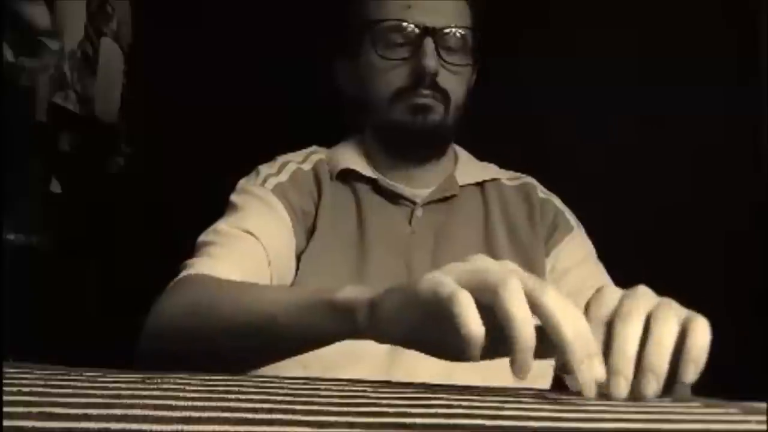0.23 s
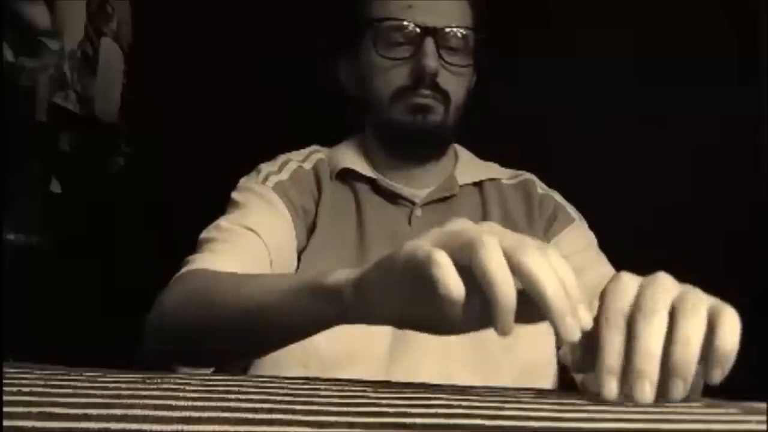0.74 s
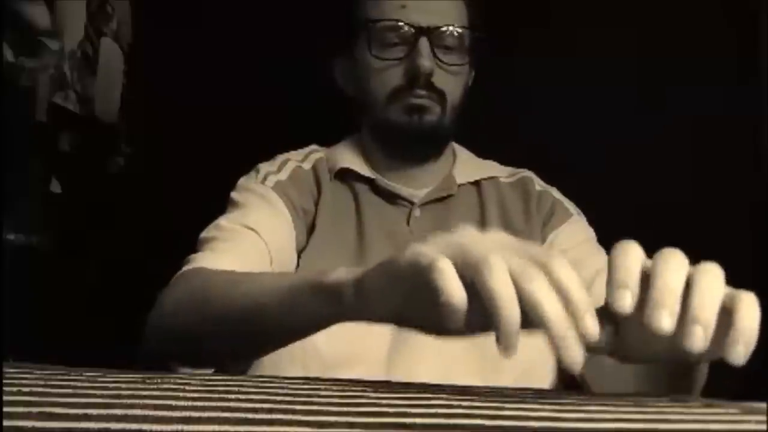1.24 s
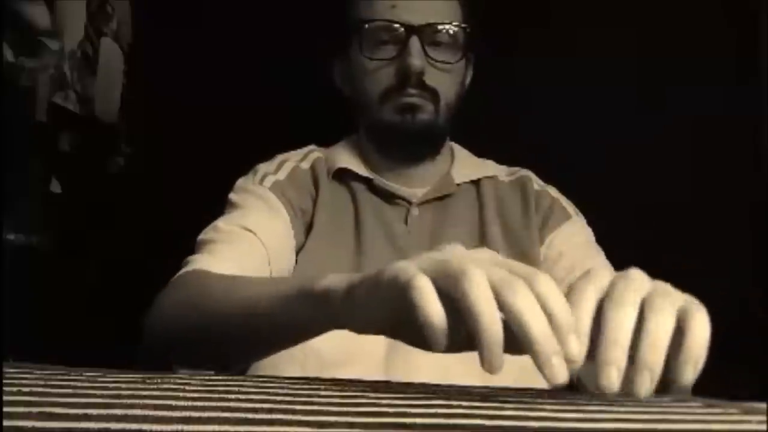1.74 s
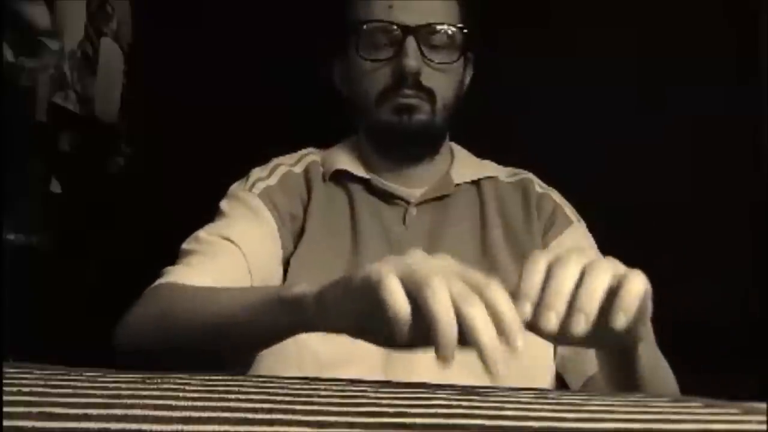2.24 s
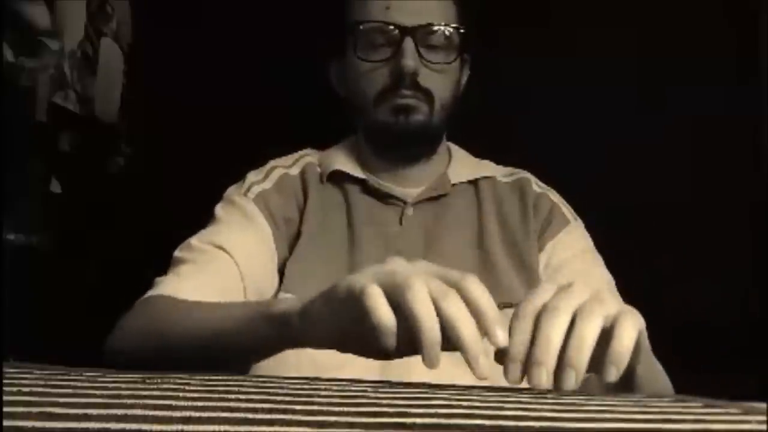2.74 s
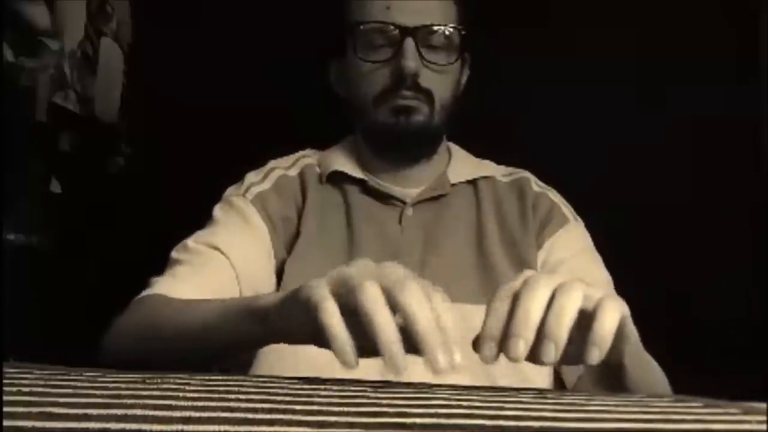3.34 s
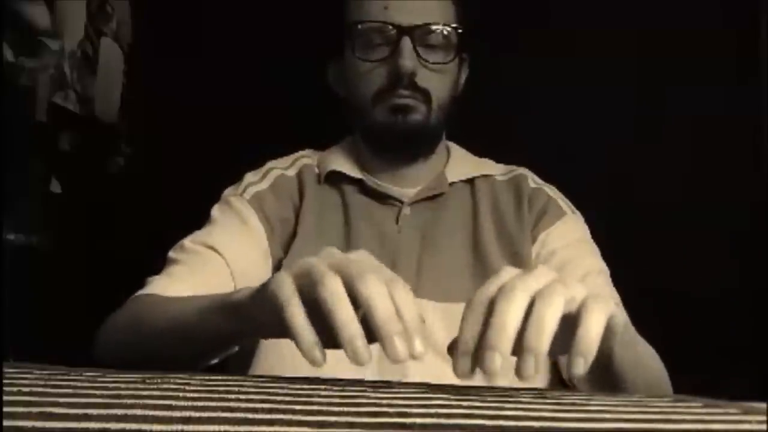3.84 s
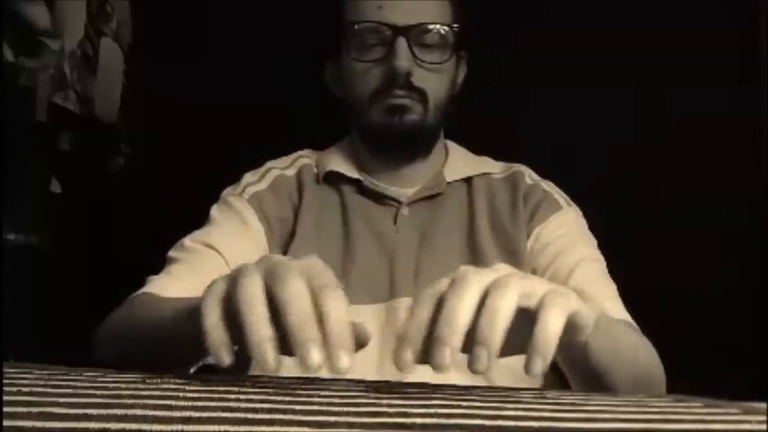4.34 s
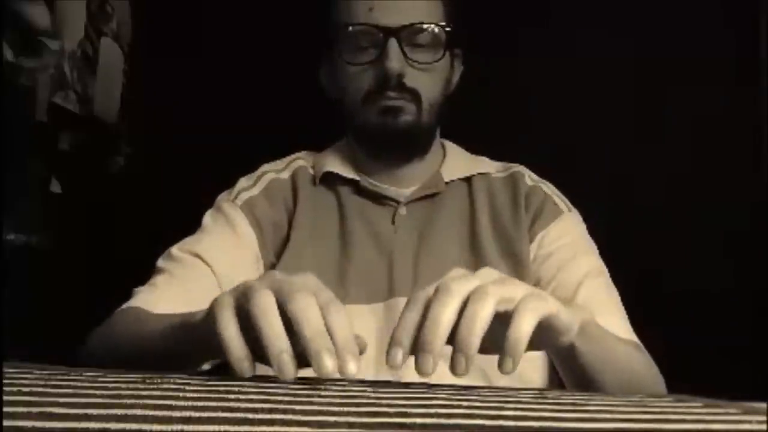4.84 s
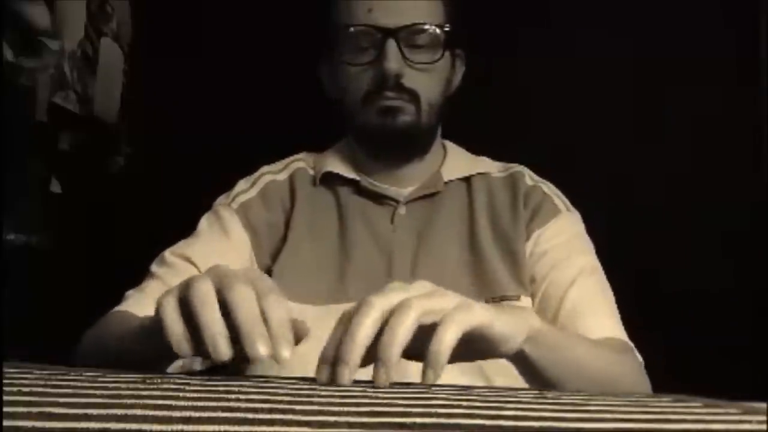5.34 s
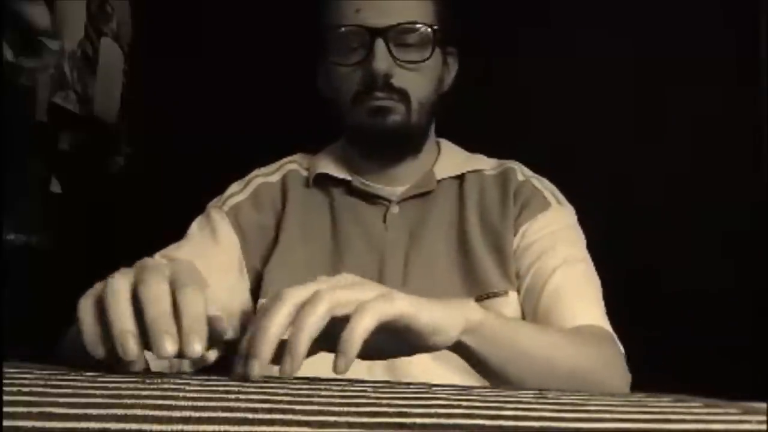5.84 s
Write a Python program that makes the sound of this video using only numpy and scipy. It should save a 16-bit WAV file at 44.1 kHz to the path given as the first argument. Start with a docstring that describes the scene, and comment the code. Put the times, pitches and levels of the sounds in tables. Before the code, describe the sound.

Close, irregular finger tapping on a wooden tabletop drifts from right to left, growing scratchier and ending with two sharp nail clicks.

```python
"""In a quiet room, forearms shift on a cloth-covered wooden table: noise keeps its low modes murmuring.
Then fingertips drum unevenly from right to left: each landing rings a bank of board modes,
nails tick as short noise cracks through nail resonances, and pads scuff the weave as clumped noise.
From 4.3 s the fingers curl and slides sound finer; the last and loudest ticks come just after 6 s.
Feedback delays echo all contacts; two spaced microphones on the table hear place as level and delay."""
import sys
import numpy as np
from scipy import signal
from scipy.fft import rfft, irfft, next_fast_len
from scipy.io import wavfile

SR = 44100
rng = np.random.default_rng(int(sys.argv[2]) if len(sys.argv) > 2 else 0)


def output_pcm(signal):
    """Save a mono or channel-first signal as 16-bit PCM at the path in sys.argv[1].

    Samples are clipped to [-1, 1] before scaling.
    """
    pcm = np.clip(np.atleast_2d(signal).T, -1, 1) * 32767
    wavfile.write(sys.argv[1], SR, np.round(pcm).astype(np.int16))


N = 268128   # samples


def from_db(db):
    """Decibel law: amplitude gain of a level."""
    return 10 ** (np.asarray(db) / 20)


def rms_one(x):
    """Power normalization: scaled to unit rms."""
    return x / np.sqrt(np.mean(x ** 2) + 1e-20)


def at_hz(points, hz):
    """Spectral interpolation: levels read on a log-frequency axis."""
    point_hz, value = np.array(points).T
    return np.interp(np.log(hz), np.log(point_hz), value)


# background spectrum: (frequency [Hz], relative density [dB per Hz])
HUSH_SPECTRUM = [(20, -10), (45, 0), (65, -25), (93, -3.5), (140, -18), (300, -21), (500, -23.5),
                 (900, -25.5), (1900, -25), (4500, -24.5), (8000, -29), (12000, -34), (16000, -34)]
# left-right likeness of the background: (frequency [Hz], correlation [-1 to 1])
HUSH_LIKENESS = [(60, 1), (240, 0.45), (950, -0.013), (3770, -0.044), (15000, -0.045)]
HUSH_DB = -56


def hush():
    """Partial coherence: room rumble alike on both sides, under the microphones' own unlike hiss."""
    hz = np.maximum(np.fft.rfftfreq(N, 1 / SR), 10)
    mid, side = rfft(rng.standard_normal((2, N))) * from_db(at_hz(HUSH_SPECTRUM, hz))
    alike = np.clip(at_hz(HUSH_LIKENESS, hz), -1, 1)
    opposite = np.array([[1], [-1]])
    spectrum = np.sqrt(1 + alike) * mid + np.sqrt(1 - alike) * side * opposite
    return from_db(HUSH_DB) * rms_one(irfft(spectrum, N))


def ring(clicks, hz, t60):
    """Damped resonance: a unit click sets a sine of height 1 ringing."""
    r, w = from_db(-60 / (t60 * SR)), 2 * np.pi * hz / SR
    return signal.lfilter([0, np.sin(w)], [1, -2 * r * np.cos(w), r * r], clicks + 1e-18)


# low modes of the table board: (frequency [Hz], relative level [dB], free t60 [s])
LOW_MODES = [(29.7, -1, 0.27), (44.7, -6.5, 0.28), (67.3, -4, 0.4), (92.7, -0.5, 0.25), (128.2, 2.5, 0.16),
             (129.9, -9, 0.48), (153.6, 3.5, 0.17), (167.6, -6, 0.37), (189.8, -9.5, 0.41),
             (227.4, -9.5, 0.12), (282.7, 6.5, 0.03), (317.6, -7.5, 0.14), (327.5, -3, 0.053)]
# forearms shifting on the board: (time [s], rumble level [dB])
ARM_RUMBLE = [(0.0, -67), (0.81, -83), (1.24, -60), (1.79, -60), (2.39, -55), (2.54, -50.5), (2.69, -79),
              (2.88, -63), (3.32, -50), (3.69, -62.5), (4.67, -48.5), (4.81, -70.5), (5.0, -58),
              (5.61, -50.5), (6.08, -64)]


def arms(lumpy_db=4, lumps_per_s=8):
    """Forced vibration: uneven pressure of the forearms keeps the low modes murmuring."""
    s, db = np.transpose(ARM_RUMBLE)
    t = np.arange(N) / SR
    lumps = np.interp(t * lumps_per_s, np.arange(200), rng.standard_normal(200))
    push = rng.standard_normal(N) * from_db(lumpy_db * lumps)
    murmur = np.zeros(N)
    for k, (hz, mode_db, t60) in enumerate(LOW_MODES):
        murmur += (-1) ** k * from_db(mode_db) * ring(push, hz, t60)
    return from_db(np.interp(t, s, db)) * rms_one(murmur)


LAG_S_PER_DB = -.00004   # the far microphone hears it later


def sides(pan_db):
    """Level difference: left and right gains of mean one; positive pan lies left."""
    gain = from_db([pan_db / 2, -pan_db / 2])
    return gain / gain.mean()


def add(out, piece, s, pan_db):
    """Superposition: lays a two-channel piece down, panned, with the far side late."""
    for ch, (gain, way) in enumerate(zip(sides(pan_db), (1, -1))):
        at = max(round((s + way * LAG_S_PER_DB * pan_db / 2) * SR), 0)
        out[ch, at:at + piece.shape[1]] += gain * piece[ch, :N - at]


# upper modes of the board: (frequency [Hz], relative level [dB], t60 [s])
UPPER_MODES = [(395, -1.5, 0.035), (471.5, -6, 0.088), (511, 1.5, 0.022), (630, -4, 0.057),
               (718, -0.5, 0.023), (791, -1, 0.053), (885, -0.5, 0.041), (1130, 2.5, 0.012),
               (1482, 1.5, 0.011)]
# finger landings: (time [s], knock drive [dB], upper mode favoured by the spot [Hz], pad thud drive [dB],
# boom drive [dB], centre of the boom [octaves above 100 Hz], place as left-over-right pan [dB])
LANDINGS = [(0.194, -35, 535, -35.5, -34.5, -0.26, -13), (0.208, -39, 560, -37, -39.5, 0.96, -9),
            (0.455, -45, 405, -23, -30.5, -0.53, -12.5), (0.462, -32, 420, -49, -26.5, 0.92, -9),
            (0.745, -37, 820, -45.5, -38, -0.66, -2.5), (0.963, -44.5, 409, -38.5, -43, 0.41, -9.5),
            (1.09, -29, 409, -40.5, -38.5, -0.95, -9), (1.105, -57, 764, -61, -63, -0.2, -1.5),
            (1.191, -41.5, 409, -45, -46.5, .6, -9), (1.369, -37, 750, -47.5, -49.5, 0.89, -1.5),
            (1.549, -35, 504, -35.5, -33.5, -0.67, -6), (1.568, -28.5, 820, -47.5, -44.5, 0.61, -9),
            (1.598, -52, 818, -40, -38.5, -0.037, -3), (1.857, -37.5, 409, -46, -46.5, -0.63, -4),
            (2.001, -38.5, 409, -46.5, -43, 0.29, -8.5), (2.13, -48, 840, -46.5, -35, -0.69, -4.5),
            (2.248, -36, 400, -35.5, -36.5, 0.65, -5), (2.267, -54, 463, -55, -47, 0.52, -3),
            (2.392, -43, 571, -51, -31.5, -0.075, -4), (2.404, -44, 495, -48, -24, 0.034, -5),
            (2.889, -31, 415, -31, -36.5, 0.5, -12), (3.049, -45, 409, -45, -45, .6, 1),
            (3.148, -34, 543, -42.5, -32.5, -0.096, -10.5), (3.186, -44.5, 872, -47, -50, 0.76, -7),
            (3.286, -42.5, 409, -44, -32.5, -0.34, -1.5), (3.409, -28.5, 555, -33, -26, 0.1, -8.5),
            (3.425, -34.5, 905, -55, -40, 0.56, -3.5), (3.449, -49, 409, -51, -43, 0.18, -5),
            (3.611, -50, 600, -49, -39, 0.09, 0.5), (3.711, -41, 883, -44.5, -36.5, .6, -2.5),
            (3.886, -45.5, 937, -48.5, -34, -0.37, 2.5), (3.968, -41.5, 635, -41.5, -39.5, 0.52, -2),
            (4.124, -38.5, 790, -68, -36, 0.21, 4), (4.134, -61, 721, -38.5, -45, 0.51, 2.5),
            (4.195, -37, 607, -50, -38, -0.61, -1.5), (4.211, -47, 409, -56, -47, 0.55, -1.5),
            (4.338, -43.5, 530, -47, -42.5, -0.11, 7), (4.452, -34, 613, -52, -39, -.6, 0),
            (4.487, -36.5, 930, -45.5, -50, -0.63, 0), (4.61, -34.5, 463, -45, -35, -1.15, 7),
            (4.62, -36, 764, -40.5, -48, 1, 3), (4.964, -45, 600, -47, -35, 0.06, 9),
            (4.976, -37, 935, -40.5, -43.5, 0.094, 11), (5.11, -42, 884, -38.5, -31.5, -0.11, 2),
            (5.195, -30.5, 405, -37.5, -36, 0.26, 14), (5.323, -40.5, 640, -45, -39, -0.46, 3),
            (5.415, -31.5, 910, -35.5, -28, 0.29, 7), (5.514, -37, 820, -39.5, -30.5, -0.042, 5.5),
            (5.525, -35, 784, -40, -32, 0.047, 3), (5.669, -39, 780, -34, -31.5, -0.13, 10.5),
            (5.742, -36.5, 880, -34, -34.5, 0.053, 6.5), (5.892, -41.5, 790, -65, -33.5, -0.011, 9.5),
            (5.969, -35, 610, -39.5, -40, -0.044, 6.5)]
THUD_FROM_HZ = 210   # low modes above this follow the thud drive, those below the boom drive
# modes away from the centre of the boom, or from the spot's favoured one, are struck more weakly
BOOM_DB_PER_OCTAVE, SPOT_DB_PER_OCTAVE = 11.5, 5.5
BOOM_PAN_SHARE, BOOM_PAN_DB = 0.4, 5.5   # the boom leans left and follows the place only in part
KNOCK_PAN_SHARE = 0.71
SETTLE_PER_S = 0.036   # share of the free ring time lost as the hands settle on the board


def board(contact_hz=400, knock_contact_hz=1500, spread_db=3.5, apart_db=5.5, full_pan_hz=110,
          swell_cycles=0.23, boom_apart_db=3.5):
    """Modal excitation: a landing strikes all modes, neighbours in opposite sense so the boom swells.

    The soft pad low-passes the blow."""
    low, clicks = np.zeros((2, N)), np.zeros((len(UPPER_MODES), 2, N))
    t = np.arange(SR // 3) / SR
    luck = rng.standard_normal((len(LANDINGS), 3, len(LOW_MODES) + len(UPPER_MODES)))
    for (s, knock_db, spot_hz, thud_db, boom_db, centre, pan_db), chance in zip(LANDINGS, luck):
        free = np.clip(1 - SETTLE_PER_S * s, .2, 1.5)
        knock_pan_db = KNOCK_PAN_SHARE * pan_db
        boom_pan_db = BOOM_PAN_DB + BOOM_PAN_SHARE * pan_db

        for k, (hz, mode_db, t60) in enumerate(LOW_MODES):
            if hz > THUD_FROM_HZ:
                drive_db, mode_pan_db = thud_db, knock_pan_db
            else:
                drive_db = boom_db - BOOM_DB_PER_OCTAVE * abs(np.log2(hz / 100) - centre)
                mode_pan_db = boom_pan_db * min(hz / full_pan_hz, 1)
            height = (-1) ** k * from_db(drive_db + mode_db + spread_db * chance[0, k])
            decay = np.exp(-np.log(1000) * t / (t60 * free))
            swell = 1 - np.exp(-t * hz / swell_cycles)   # the pad sinks in over part of a cycle
            tone = height * decay * swell * np.sin(2 * np.pi * hz * t)
            add(low, tone * from_db(boom_apart_db * chance[1:, [k]]), s + 0.00094, mode_pan_db)

        for k, (hz, mode_db, t60) in enumerate(UPPER_MODES):
            level_db = knock_db - 5.5 + mode_db - SPOT_DB_PER_OCTAVE * abs(np.log2(hz / spot_hz))
            # each microphone sits on another part of the mode
            heard_db = level_db + apart_db * chance[1:, [-1 - k]]
            add(clicks[k], (-1) ** k * from_db(heard_db), s, knock_pan_db)

    knocks = sum(ring(c, hz, t60) for c, (hz, db, t60) in zip(clicks, UPPER_MODES))
    soft_low = signal.lfilter(*signal.butter(2, contact_hz, fs=SR), low)
    return soft_low + signal.lfilter(*signal.butter(1, knock_contact_hz, fs=SR), knocks)


def place(s):
    """Localization: pan in dB of the nearest landing."""
    return min(LANDINGS, key=lambda landing: abs(landing[0] - s))[-1]


def fineness(hz, tilt_db, edge_hz=2200, edge_octaves_per_db=1.09, flat_hz=9000):
    """Contact scale: finer contact tilts the colour up about 5 kHz and raises its low edge."""
    low_edge_hz = edge_hz * 2 ** (edge_octaves_per_db * tilt_db)
    edge = 1 / np.sqrt(1 + (low_edge_hz / hz) ** 8)
    return edge * from_db(tilt_db * np.log2(np.minimum(hz, flat_hz) / 5000))


# resonances of nail and surface: (frequency [Hz], width [Hz], relative level [dB])
NAIL_MODES = [(2040, 107, -0.5), (2696, 270, 2), (3440, 470, 4), (4620, 450, 5), (5680, 910, 7.5),
              (7120, 630, 1), (9070, 570, -3), (11750, 16000, -29)]
# nail ticks, heard at the place of the nearest landing:
# (time [s], relative peak level [dB], brightness [dB per octave])
NAIL_TICKS = [(0.196, -24, -17), (0.212, -24.5, -9), (0.235, -27.5, 1), (0.4561, -19, -15),
              (0.4637, -23, -9), (0.5118, -35, -4), (0.5169, -29.5, -3), (0.746, -26.5, -14.5),
              (0.9653, -31, -14), (0.9847, -17, 2), (1.1044, -36, -5), (1.1454, -41, 5.5),
              (1.1913, -29, -20), (1.3687, -33, -14), (1.5517, -29.5, -14), (1.5693, -20, -14.5),
              (1.5815, -27, 3), (1.5996, -25.5, -7), (1.8562, -44, -6), (2.0028, -21.5, -12),
              (2.128, -29, -20), (2.2502, -17.5, -17), (2.266, -25, 9), (2.3929, -19, -10.5),
              (2.4384, -20.5, -4.5), (2.8906, -19, -21), (2.9276, -36, 5), (3.0523, -23.5, -14.5),
              (3.097, -38.5, 1), (3.1485, -22, -16), (3.1844, -36.5, 3), (3.2869, -27.5, -12),
              (3.356, -34, -9), (3.4098, -19, -3), (3.414, -21, -28), (3.4274, -18.5, -5),
              (3.451, -24, 4.5), (3.612, -38, -7), (3.7126, -20, -8), (3.8866, -31.5, 5),
              (3.9637, -30, -6.5), (4.122, -43, -6), (4.125, -35, 7), (4.14, -28.5, 5), (4.1938, -25, -5.5),
              (4.337, -39, 4), (4.3506, -35, -2), (4.4528, -30, 8), (4.6113, -56, 2), (4.967, -37, 0),
              (4.9764, -25, 2), (5.1118, -31, -2), (5.1395, -35.5, -5), (5.1908, -27.5, 4),
              (5.197, -19.5, 3.5), (5.2087, -30, 11), (5.324, -25, -1), (5.365, -23, 11),
              (5.372, -15.5, -4), (5.4152, -20.5, 5), (5.4385, -19.5, 1.5), (5.468, -15.5, 3),
              (5.5155, -28, 7), (5.5466, -27, 4), (5.571, -42, 6.5), (5.668, -43, 5), (5.7419, -20, -7),
              (5.7784, -17.5, 3.5), (5.8921, -23, 2.5), (5.9677, -28, 3), (5.978, -23, -2),
              (5.9967, -10, 4), (6.0112, -10, 4)]


def ticks(rise_ms=0.51, fall_ms=0.67, alike=0.37, spread_db=4.5, crest_db=-1):
    """Impulse response: a millisecond crack that rings briefly in nail and surface."""
    out, ms = np.zeros((2, N)), np.arange(1024) / SR * 1000
    shape = (1 - np.exp(-ms / rise_ms)) * np.exp(-ms / fall_ms)
    hz = np.fft.rfftfreq(len(ms), 1 / SR)
    for s, db, tilt_db in NAIL_TICKS:
        both, left, right = rng.standard_normal((3, len(ms))) * shape
        strength = from_db(spread_db * rng.standard_normal(len(NAIL_MODES)))
        response = np.zeros(len(hz), complex)
        for k, (mode_hz, width, mode_db) in enumerate(NAIL_MODES):
            height = strength[k] * from_db(mode_db) * fineness(mode_hz, tilt_db, edge_hz=330)
            resonance = 1j * hz * width / (mode_hz ** 2 - hz ** 2 + 1j * hz * width)
            response += (-1) ** k * height * resonance
        noise = np.sqrt(alike) * both + np.sqrt(1 - alike) * np.array([left, right])
        crack = irfft(rfft(noise) * response)
        add(out, from_db(db + crest_db) * crack / np.abs(crack).max(), s - .0005, place(s))
    return out


# spectrum of the rubbed cloth: (frequency [Hz], relative density [dB per Hz])
WEAVE_SPECTRUM = [(500, -17.5), (1000, -17), (1600, -12), (2100, -8.5), (2900, -4.5), (4700, -3),
                  (6500, -7.5), (9000, -11), (12000, -20.5), (14000, -21), (16000, -28.5)]


def woven(x, tilt_db, drag_db=-26):
    """Source filtering: colours an excitation with the cloth and the board's upper modes; rms 1."""
    hz = np.maximum(np.fft.rfftfreq(x.shape[1], 1 / SR), 20)
    colour = fineness(hz, tilt_db) * from_db(at_hz(WEAVE_SPECTRUM, hz))
    drag = np.zeros(len(hz))   # friction also shakes the board
    for mode_hz, db, t60 in UPPER_MODES:
        drag += from_db(db) / np.hypot(1, (hz - mode_hz) * t60 * 2 * np.pi / np.log(1000))
    return rms_one(irfft(rfft(x) * (colour + from_db(drag_db) * drag), x.shape[1]))


# pads scuffing the cloth, heard at the place of the nearest landing:
# (time [s], relative level [dB], rise from half height [ms], fall to half height [ms])
PAD_SCUFFS = [(0.1957, -43, 0.67, 14), (0.233, -43.5, 5.3, 5.7), (0.4565, -30, 1.4, 4.9),
              (0.488, -50, 11, 6.5), (0.5144, -48.5, 13, 4.9), (0.7479, -42.5, 1.6, 12),
              (0.9838, -36.5, 3.1, 7.7), (1.0921, -37, 1, 3.8), (1.195, -47, 1.2, 5.8),
              (1.2284, -42, 7.7, 7.8), (1.3673, -44, 0.83, 8.7), (1.5508, -37.5, 0.99, 14),
              (1.5707, -43, 1.5, 17), (1.6005, -38.5, 2.9, 9.5), (1.858, -40.5, 0.49, 9.2),
              (2.0194, -49.5, 16, 12), (2.1288, -43.5, 0.52, 10.5), (2.191, -56.5, 29, 18),
              (2.2494, -34.5, 0.83, 8.2), (2.2679, -39, 8.1, 14.6), (2.3935, -39, 2, 11),
              (2.435, -44.5, 4.1, 8.2), (2.8142, -59, 7.5, 11), (2.89, -34.5, 2.7, 7.8),
              (2.947, -44.5, 3.3, 4.8), (3.052, -49.5, 0.8, 12), (3.1137, -51.5, 8.2, 6.1),
              (3.1495, -28.5, 1.55, 3.1), (3.227, -46, 5.4, 4.9), (3.2885, -40.5, 2.8, 6.1),
              (3.3557, -58, 21, 6.6), (3.4109, -36.5, 0.99, 9.6), (3.43, -40, 2.8, 3.4),
              (3.4557, -38, 5.8, 4.2), (3.614, -56, 6.2, 32), (3.6324, -56, 2.8, 6.2),
              (3.7133, -45, 2.4, 18.3), (3.7363, -46, 6.5, 11), (3.8847, -42, 3.5, 11),
              (3.9655, -43.5, 2.9, 18.4), (4.1243, -40.5, 4.4, 19), (4.1907, -42.5, 1.1, 19),
              (4.219, -41.5, 4.6, 6.2), (4.3537, -49.5, 11, 8.4), (4.386, -45.5, 5.8, 12),
              (4.4071, -42, 20, 10.4), (4.4528, -41.5, 0.63, 20), (4.4952, -45, 9.5, 21),
              (4.6117, -36, 0.96, 7.5), (4.654, -48, 15, 13), (4.9789, -45, 12.3, 10),
              (5.0165, -47, 17, 9.8), (5.1124, -50.5, 7.7, 11), (5.1393, -51, 6.6, 7),
              (5.1965, -35.5, 1.7, 6.1), (5.2367, -40, 6.6, 12), (5.324, -40.5, 0.69, 4),
              (5.3483, -38.5, 7.9, 4.9), (5.3741, -25.5, 3.8, 5.3), (5.418, -37.5, 1.4, 14),
              (5.472, -31.5, 8.3, 6.8), (5.5192, -38, 3.6, 17), (5.5476, -38.5, 1.6, 8.6),
              (5.5795, -37.5, 14, 9.1), (5.67, -38, 1.3, 8.6), (5.6995, -39, 3.8, 6.5),
              (5.7418, -39.5, 1.7, 17), (5.764, -31, 1.4, 5.1), (5.7813, -26.5, 3.7, 8),
              (5.895, -45.5, 0.65, 16), (5.9332, -32.5, 8.4, 6.4), (5.9743, -45, 9.4, 24),
              (6.01, -33, 12.5, 11.6)]
# from here the fingers curl: slides are finer and a landing dulls them less
CURL_FROM_S, CURLED_TILT, CURLED_SHARE = 4.3, 0.77, 0.61
SLIDE_TILT, LANDING_TILT = -0.19, -4   # free slide, and added under a landing finger [dB per octave]
LANDING_S = .008   # a scuff this near a landing counts as under it


def scuffs(grain_db=2.5, clump_db=2.5, clump_ms=1.5):
    """Stick-slip friction: threads catch and let go in a dense, clumped crackle that swells and dies."""
    before = 3072   # samples ahead of the crest
    out, ms = np.zeros((2, N)), (np.arange(8192) - before) / SR * 1000
    for s, db, rise_ms, fall_ms in PAD_SCUFFS:
        tilt_db, landing_share = (SLIDE_TILT, 1) if s < CURL_FROM_S else (CURLED_TILT, CURLED_SHARE)
        if min(abs(landing[0] - s) for landing in LANDINGS) < LANDING_S:
            tilt_db += LANDING_TILT * landing_share
        grain = np.minimum(rng.exponential(1, len(ms)), 5)
        threads = rng.standard_normal((2, len(ms))) * from_db(grain_db * grain)
        lumps = np.interp((ms - ms[0]) / clump_ms, np.arange(400), rng.standard_normal(400))
        crackle = woven(threads * from_db(clump_db * lumps), tilt_db)
        rise = 2. ** -(ms / max(rise_ms, .3)) ** 2
        fall = 2. ** -(np.abs(ms) / max(fall_ms, 1)) ** 1.25
        add(out, from_db(db) * crackle * np.where(ms < 0, rise, fall), s - before / SR, place(s))
    return out


ROOM_T60_S, ROOM_DB = 0.21, -15   # ring time before the walls' treble loss
WALL_CUT_HZ = 8000
TICK_ROOM_DB = -4.5   # the small ticks reach the walls more weakly


def room(x, thin_hz=250):
    """Reverberation: sixteen feedback delays a side, duller on every round, then scattered.

    The close boom hardly reaches the walls."""
    size = next_fast_len(N + SR // 2)
    w = 2 * np.pi * np.fft.rfftfreq(size, 1 / SR)
    dull = 1 / (1 + 1j * w / (2 * np.pi * WALL_CUT_HZ))
    walls = np.zeros((2, len(w)), complex)
    for k, lag in enumerate(rng.uniform(.008, 0.037, 32)):
        loop = from_db(-60 * lag / ROOM_T60_S) * dull * np.exp(-1j * w * lag)
        walls[k % 2] += (-1) ** (k // 2) * loop / (1 - loop)
    for lag in rng.uniform(0.00097, 0.0038, (2, 2, 1)):   # all-pass scattering
        late = np.exp(-1j * w * lag)
        walls *= (late - .6) / (1 - .6 * late)
    thin = 1j * w / (1j * w + 2 * np.pi * thin_hz)
    return irfft(rfft(x.mean(axis=0), size) * walls * thin, size)[:, :N]


def scene():
    """Superposition: table sounds with their echoes over the quiet floor."""
    taps, nails, slides = board(), ticks(), scuffs()
    echoes = from_db(ROOM_DB) * room(taps + from_db(TICK_ROOM_DB) * nails + slides)
    return taps + nails + slides + echoes + arms() + hush()


def record(dry):
    """Band limiting: a steep low-pass takes the top down by 70 dB from 16.6 kHz."""
    return signal.sosfilt(signal.cheby2(12, 70, 16600, fs=SR, output="sos"), dry)


dry = scene()
out = record(dry)
output_pcm(out)
```